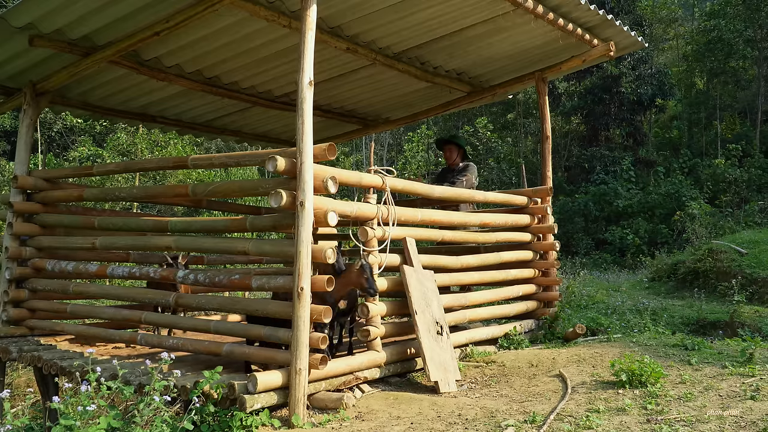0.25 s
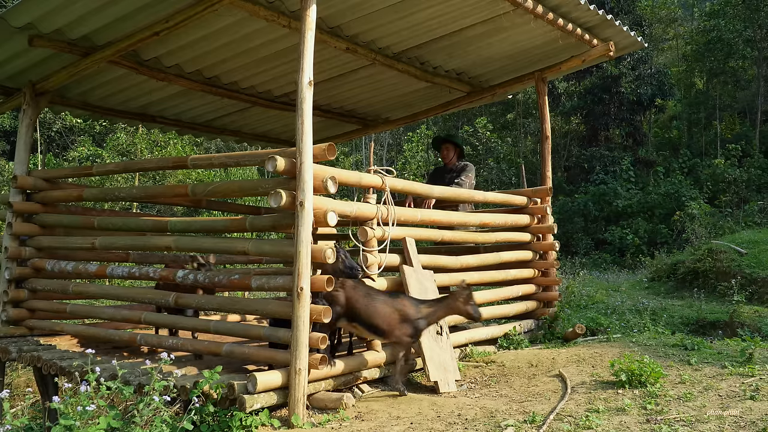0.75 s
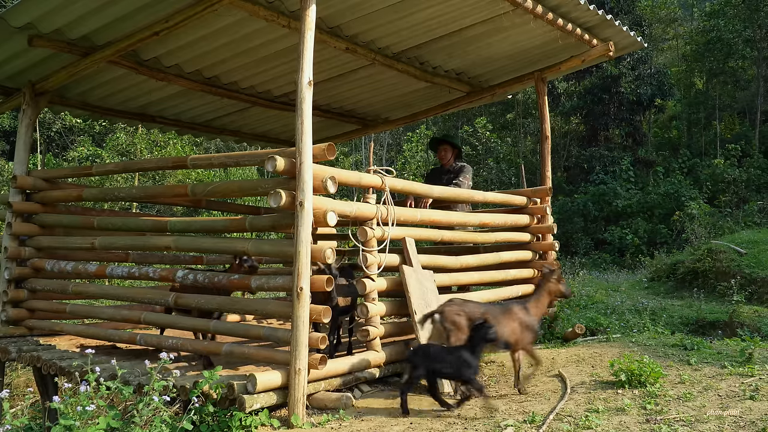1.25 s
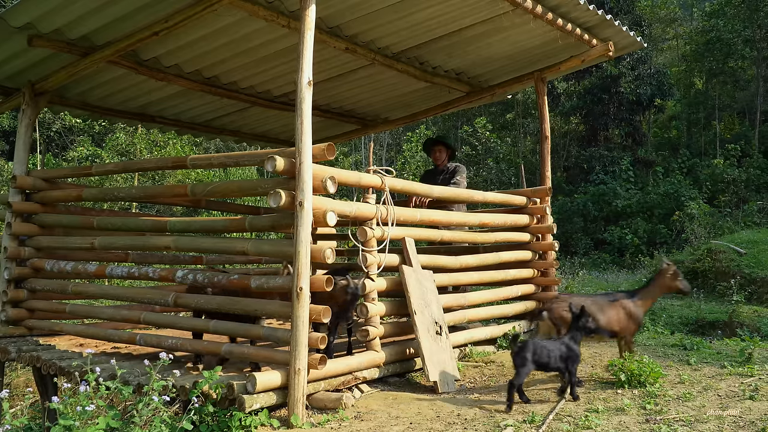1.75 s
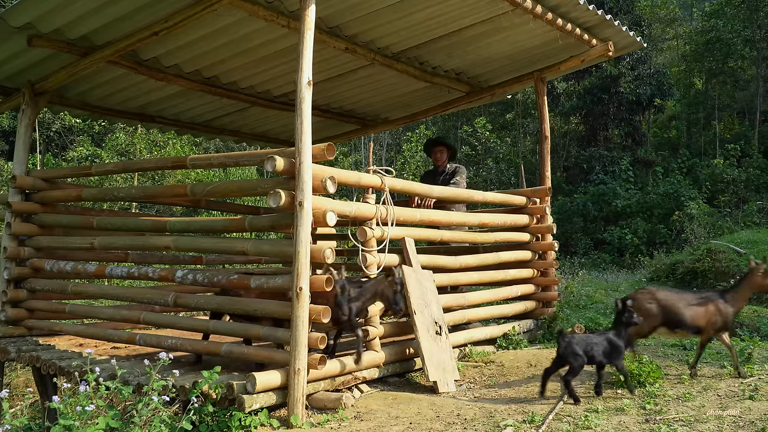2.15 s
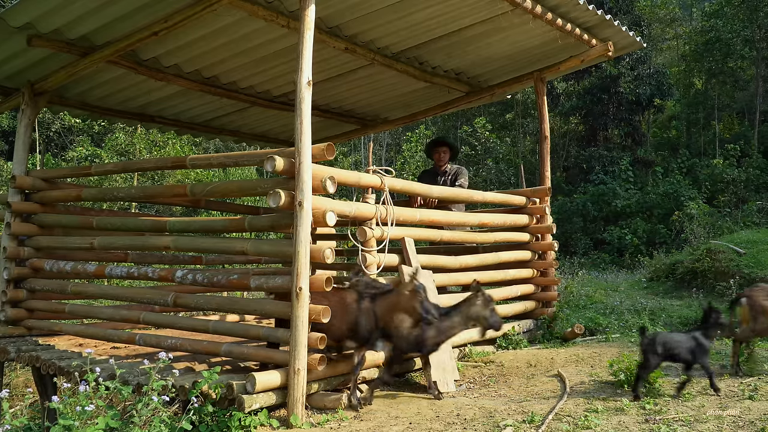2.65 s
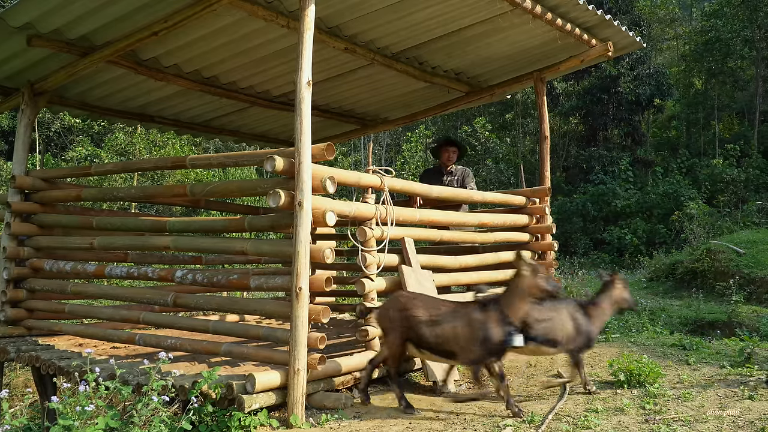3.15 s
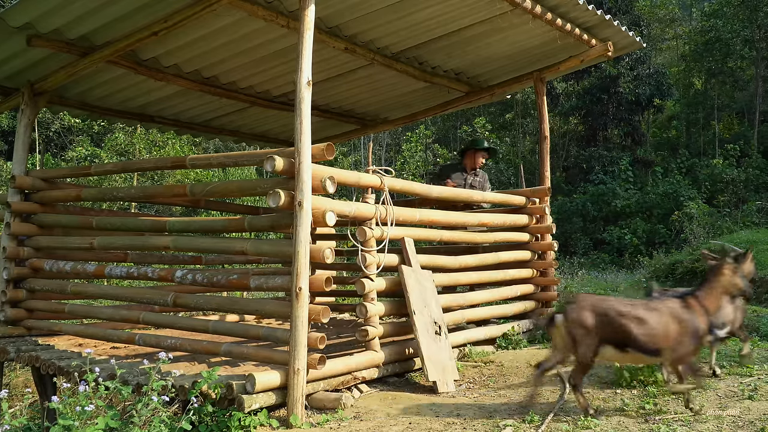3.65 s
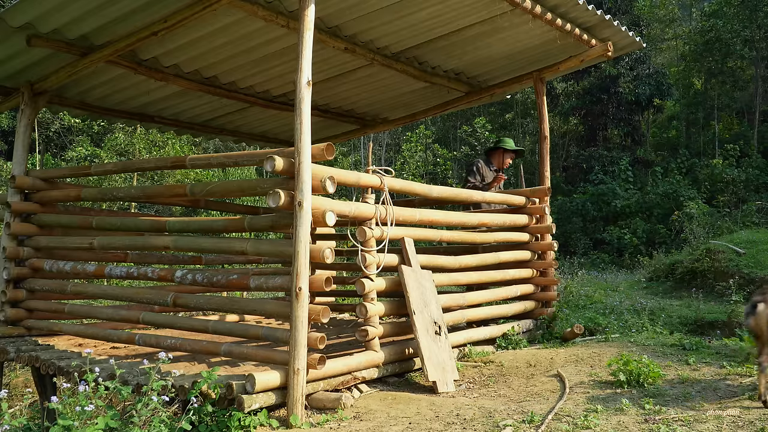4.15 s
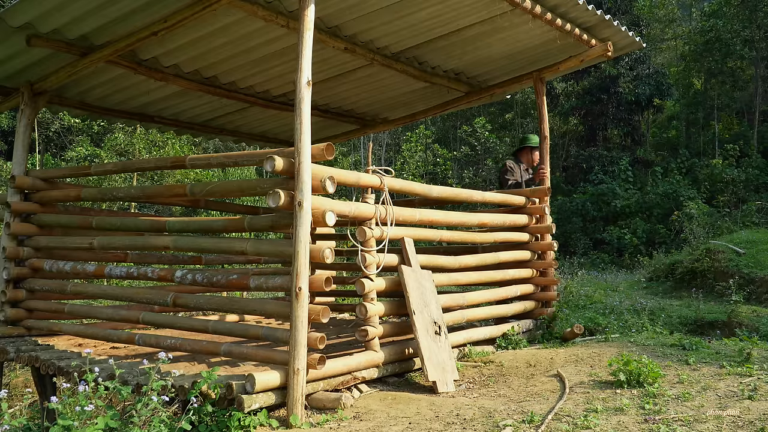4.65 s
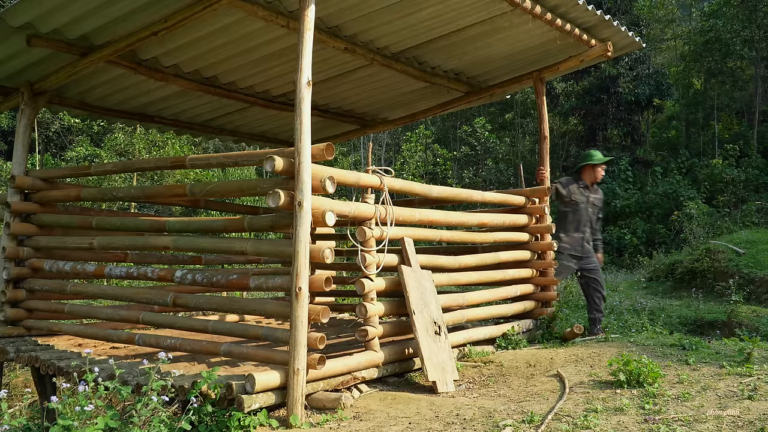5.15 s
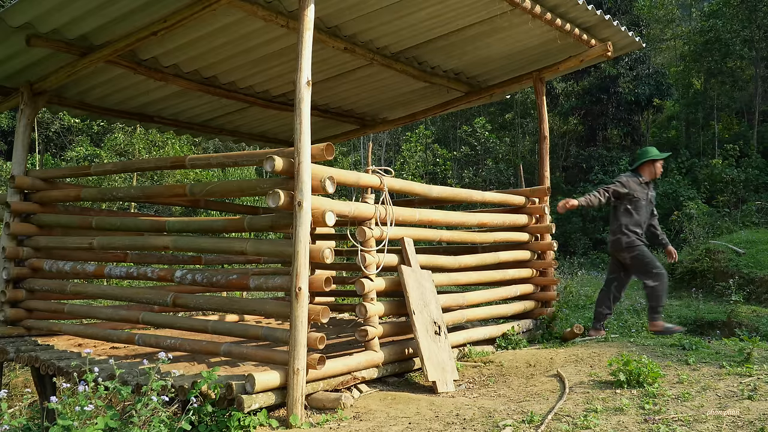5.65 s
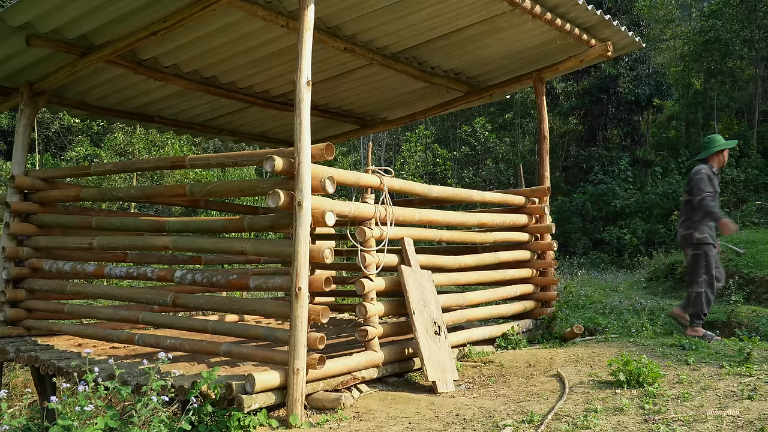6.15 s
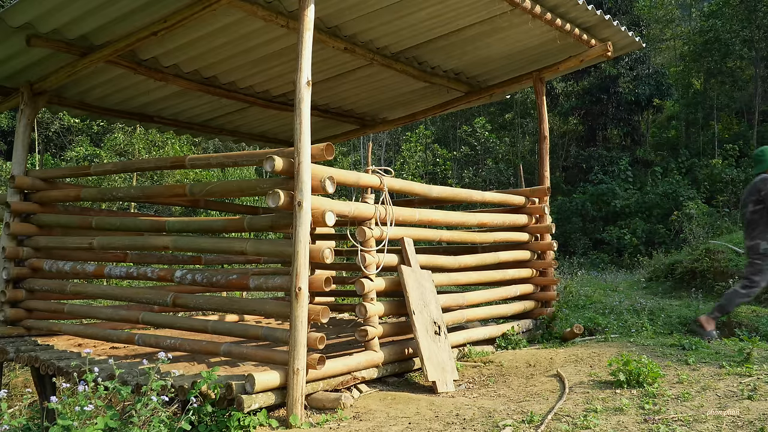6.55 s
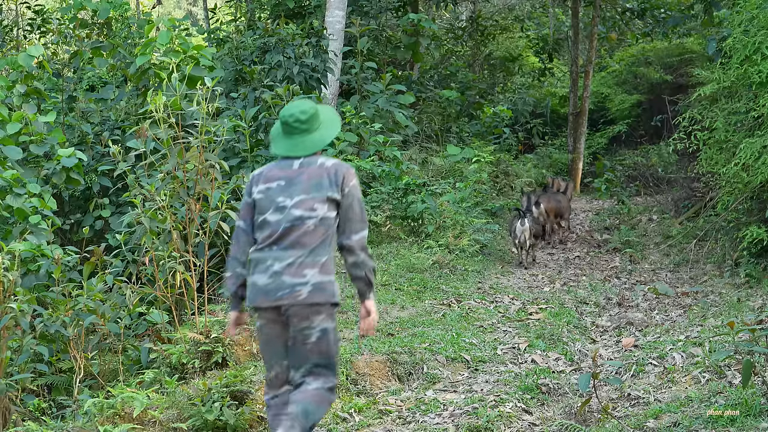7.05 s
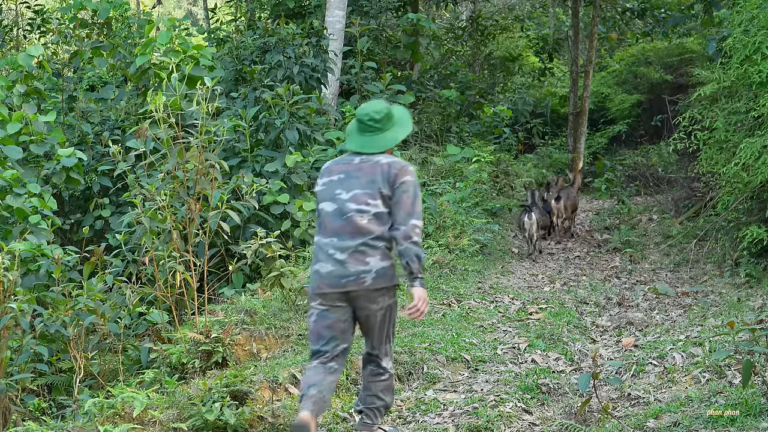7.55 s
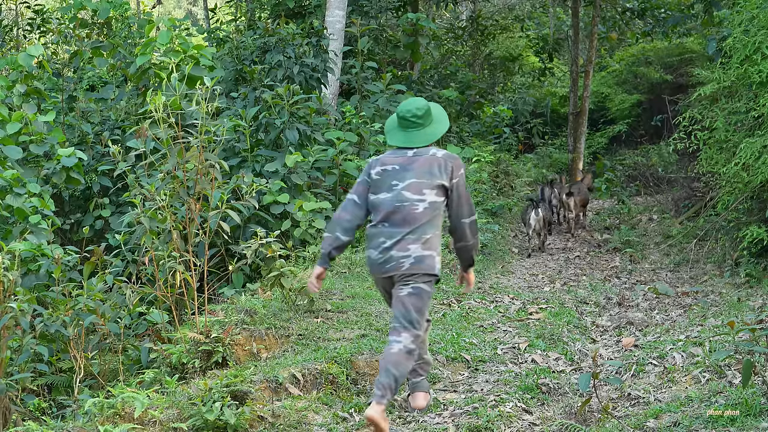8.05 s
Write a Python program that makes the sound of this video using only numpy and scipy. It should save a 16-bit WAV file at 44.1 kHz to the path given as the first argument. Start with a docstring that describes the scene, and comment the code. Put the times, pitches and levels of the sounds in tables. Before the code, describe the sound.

In the open beside a log pen, a faint hoarse squeal fades over the first 0.6 seconds among hoof knocks on wooden poles and dull shuffling. Around 0.7 to 1 second come more knocks, a scrape and crackling litter, as a small high bell begins on the left, first in sparse, uneven clinks. Faint thin bird chirps appear between 1 and 2.1 seconds. A strong hollow knock lands at 2.4, with scuffling after it. From 2.7 to 6.8 the bell jingles densely and irregularly, with sharp metal clicks, buzzing clapper rattles and tree echoes, moving to the right and sinking slightly in pitch as the goat runs away. A low faint rumble rises near 4.5. The hush swells toward 6.9, then drops back. From 7 to 8.3 there are soft, dull bell touches, dry leaf scrapes, a step near 8 and faint bird notes.

```python
"""A faint hoarse squeal fades while hooves knock and shuffle on poles: goats clamber out of a log pen.
A small bell then jingles on the neck of one goat and sinks in pitch as it gathers speed towards the forest.
The bell is a sum of decaying modes struck afresh by each blow; knocks are noise through wood resonances.
Shuffling and rustling leaves are random grains, small birds are gliding sines, rumble and hush are noise.
The microphone pair is mono below about 2 kHz."""
import sys
import numpy as np
from scipy import signal
from scipy.fft import rfft, irfft, next_fast_len
from scipy.io import wavfile
from scipy.ndimage import uniform_filter1d

SR = 44100
rng = np.random.default_rng(int(sys.argv[2]) if len(sys.argv) > 2 else 0)


def dump(signal):
    """Clip the signal to [-1, 1] and save it as 16-bit WAV at the path in sys.argv[1]."""
    limited = np.clip(np.atleast_2d(signal).T, -1, 1)
    pcm = np.round(limited * 32767).astype(np.int16)
    wavfile.write(sys.argv[1], SR, pcm)


N = 365834
TIME = np.arange(N) / SR

# blows of the clapper, the dullest of which only swell the ring; levels before trim:
# start_s, strike_tone_db, brightness_db (top modes over the strike tone), click_db
STRIKES = [(0.644, -42, 7.5, -31.5), (0.957, -40, -14, -65), (1.298, -30, 6.5, -19), (1.589, -35, -23, -75),
           (1.731, -28.5, -27.5, -75), (1.845, -45, 10.5, -26.5), (2.056, -43, 12, -36),
           (2.194, -41, 6.5, -50), (2.525, -48.5, 21, -24), (2.587, -37.5, 6, -43), (2.73, -25.5, 6, -12),
           (2.881, -27, 1, -21), (3.14, -30.5, 7, -16.5), (3.324, -32.5, 8.5, -17.5), (3.436, -42, 17, -27),
           (3.584, -28.5, 7.5, -14.5), (3.648, -37, 14, -23.5), (3.778, -31.5, -1, -23.5),
           (3.95, -35.5, 4, -31.5), (4.023, -32.5, 7, -15.5), (4.137, -34, 8, -30),
           (4.218, -32.5, 10, -19.5), (4.318, -30.5, 5, -30), (4.459, -31.5, -3.5, -45),
           (4.644, -30, 3.5, -20.5), (4.764, -27, -1, -20), (4.923, -33, -9, -38), (4.989, -37, 9.5, -25),
           (5.14, -31.5, -0.5, -18.5), (5.229, -37.5, 6, -23), (5.328, -33.5, 9, -23),
           (5.449, -54.5, 14, -26.5), (5.775, -24.5, -7.5, -19), (5.888, -34, 9.5, -43),
           (6.022, -36.5, 7.5, -19.5), (6.169, -48.5, 11.5, -16.5), (6.403, -35, 1.5, -25.5),
           (6.459, -40.5, 6.5, -27), (6.523, -20, -13, -16.5), (6.536, -42.5, -1, -50),
           (6.598, -42, 11.5, -37), (6.778, -34.5, 6, -34), (6.921, -64, 10, -23.5),
           (6.972, -39.5, -10.5, -61), (7.254, -48, 6, -58), (7.483, -44, -10.5, -53.5),
           (7.626, -48.5, 2.5, -56), (7.744, -52.5, 7.5, -58), (7.851, -46, 5.5, -54)]
# modes of the bell, many in close pairs: pitch_hz, level_db (within the mode's family), t60_s
BELL_MODES = [(1296.6, -1, 1.46), (1304.5, -4.5, 7), (2320, -22, 0.13), (3552, -20, 2.6),
              (3552, -1.5, 1.33), (5560, 1, 0.18), (6728, -0.5, 6), (6694, 11, 0.8), (7960, -60, .2),
              (8202, 0, 0.33), (8380, 2, 0.18), (8760, -4.5, 0.17), (9057, -3, 0.43), (9520, -15, 0.11),
              (9750, -52, 0.12), (10740, 2.5, 0.26), (11500, -7, 0.15), (11610, 0.5, 0.11),
              (12400, -0.5, 0.31), (12400, -26, 0.21), (13930, -18, 0.2), (14370, -12, 0.047),
              (15200, -8.5, 0.11), (15300, 0, 0.14)]


def amp(db):
    """Decibels to gain."""
    return np.exp(np.asarray(db) * (np.log(10) / 20))


def unit(x):
    """Scales to rms 1."""
    return x / np.sqrt(np.mean(np.abs(x) ** 2) + 1e-20)


def curve(rows):
    """A breakpoint control, read at every sample."""
    return np.interp(TIME, *np.transpose(rows))


def read(points, hz):
    """Reads a spectrum, straight between its points on a log-frequency axis."""
    point_hz, value = np.transpose(points)
    return np.interp(np.log(hz + 1), np.log(point_hz + 1), value)


def add(mix, s, sound):
    """Mixes a sound in at time s."""
    part = mix[..., max(round(s * SR), 0):][..., :sound.shape[-1]]
    part += sound[..., :part.shape[-1]]


def shaped(x, gain):
    """Filters x by gain, a function of frequency."""
    size = next_fast_len(x.shape[-1], True)
    spectrum = rfft(x, size) * gain(np.fft.rfftfreq(size, 1 / SR))
    return irfft(spectrum, size)[..., :x.shape[-1]]


def resonant(modes, hz):
    """Response of a body: broad, with resonances standing out."""
    return 1 + sum(amp(db) / (1 + 2j * (hz - mode_hz) / width) for mode_hz, width, db in modes)


def drift(rate, size=N):
    """Smooth random wander of rms about 1, with rate new values a second."""
    at = np.arange(size) * rate / SR
    return 1.2 * np.interp(at, np.arange(2048), rng.standard_normal(2048))


def panned(db):
    """Gains of left and right, db apart, at equal total power."""
    gains = amp([[db / 2], [-db / 2]])
    return unit(gains)


def bearing(s):
    """Channel gains for the belled goat's place at time s."""
    # where the belled goat is: time_s, left_over_right_db
    places = [(0.65, 9.5), (0.73, 4.5), (1.78, 6.5), (4.01, -11), (5.67, -4.5), (6.91, -7.5), (6.97, -2),
              (8.23, -3.5), (8.3, -4)]
    return panned(np.interp(s, *np.transpose(places)))


def distance_run():
    """Metres the belled goat has run away, at every sample: its speed summed over time."""
    # pace of the belled goat: time_s, speed_m_per_s
    pace = [(0, 0.5), (2.85, 0), (3.2, 2), (3.7, 1), (4.2, 4), (4.7, 4.5), (5.8, 4.5), (6.8, 6), (7.0, 0.5),
            (8.3, 4.5)]
    return np.cumsum(curve(pace)) / SR


def family_levels(s, tone_db, bright_db):
    """A harder blow lifts the upper families of modes more than the low ones."""
    # mode families from hum to top: offset_db (against the strike tone), brightness_share
    families = [(1, 0.2), (0.5, 0.027), (-1, 0.57), (1, 0.81), (-3, 1)]
    # extra level of the lowest family, the hum: time_s, level_db
    hum_curve = [(0.65, -4.5), (1.3, -20), (1.85, -15.5), (2.1, -8), (2.9, -5.5), (4.1, -10), (4.8, -20),
                 (4.99, -0.5), (5.14, -20), (5.9, -7.5), (6.4, -16.5), (6.8, -9), (7.48, -5), (7.65, -17)]
    offset_db, share = np.transpose(families)
    is_hum = np.arange(len(families)) == 0
    hum_db = np.interp(s, *np.transpose(hum_curve)) * is_hum
    return tone_db + offset_db + share * bright_db + hum_db


def bell(bell_db=-1.0, blow_spread_db=2, phase_spread_rad=0.75, scatter_near=0.73, scatter_per_m=0.082,
         flutter_hz=22, scatter_rise_s=0.025, contact_s=0.00068, soft_rise=1.33):
    """Each blow stops the old ring and starts a new one; scatter from the swinging bell makes modes flutter."""
    # borders between the families of modes: pitch_hz
    family_edges = [2000, 4500, 7200, 10000]
    # how far the left channel leads the right: pitch_hz, phase_rad
    left_phase = [(0, 13.5), (3500, -0.32), (4700, -2), (6500, -1.5), (8200, -2), (10700, -1.5),
                  (13000, -4.5), (15500, -5.5)]
    hz, mode_db, t60 = np.transpose(BELL_MODES)[:, :, None]
    family = np.searchsorted(family_edges, hz[:, 0])
    run_m = distance_run()
    heard_time = TIME - run_m / 343  # the growing path delays the sound and so lowers its pitch
    step = 32  # samples between the points of the slow controls
    # flutter_hz holds at 7 kHz: the higher the mode, the faster the bell's motion makes it flutter
    smoothing = [signal.butter(2, flutter_hz * f / 7000, fs=SR / step) for f in hz[:, 0]]
    out = np.zeros((2, N))
    ends = [row[0] for row in STRIKES[1:]] + [TIME[-1]]
    for (s, tone_db, bright_db, _), end in zip(STRIKES, ends):
        clock = heard_time[round(s * SR):round((end + .03) * SR)]
        t = np.arange(len(clock)) / SR
        slow_t = t[::step]
        blow, phase_error, start_turn = rng.standard_normal((3, len(hz), 1))

        # where the clapper lands decides how a family's energy is shared among its modes
        share = amp(mode_db + blow_spread_db * blow)
        share = share / np.sqrt(np.bincount(family, share[:, 0] ** 2))[family, None]
        family_db = family_levels(s, tone_db, bright_db)[family, None]
        level = share * amp(family_db - 60 * slow_t / t60)

        # more of the sound comes by scattered paths at high pitch and from far away
        scatter = (scatter_near + scatter_per_m * run_m[round(s * SR)]) * (hz / 8000) ** 0.12
        scatter = scatter * (1 - np.exp(-slow_t / scatter_rise_s))  # the direct sound arrives first
        chance = rng.standard_normal((len(hz), 1024, 2)) @ [1, 1j]
        flutter = np.array([unit(signal.lfilter(*ba, z)) for ba, z in zip(smoothing, chance)])
        flutter = flutter[:, -level.shape[1]:]
        swell = (level * (1 + scatter * flutter) / np.sqrt(1 + scatter ** 2)).astype(np.complex64)
        swell = uniform_filter1d(np.repeat(swell, step, 1), step, 1)[:, :len(t)]

        angle = (2 * np.pi * ((hz * clock + start_turn) % 1)).astype(np.float32)
        modes = swell * (np.cos(angle) + 1j * np.sin(angle))
        lead_rad = read(left_phase, hz) + phase_spread_rad * phase_error
        lead = np.exp(1j * lead_rad).astype(np.complex64)
        ring = np.array([(modes * lead).sum(0), modes.sum(0)]).real

        # a dull touch builds up more slowly; the next blow cuts the ring off
        rise_s = contact_s * amp(-soft_rise * min(bright_db, 0))
        contact = (1 - np.exp(-t / rise_s)) * np.exp(-np.maximum(t - (end - s), 0) / .003)
        add(out, s, np.sqrt(2) * ring * contact * bearing(s))
    return amp(bell_db) * out


def clapper(click_db=2.0, rattle_db=-7, click_s=0.0014, rebound_s=0.018, buzz_width_hz=80, wall_db=33):
    """The hard click of metal on metal, then a buzz as the clapper rebounds and half damps the wall."""
    # when the goat bounds, the clapper rolls round the wall: start_s, level_db (before trim), decay_s
    rolls = [(4.461, -31.5, 0.36), (4.767, -20.5, 0.083), (4.991, -28, 0.08), (5.448, -32, .13),
             (5.776, -20.5, 0.2), (5.891, -40, 0.16), (6.022, -19.5, 0.082), (6.778, -23.5, 0.048)]
    click, rattle, t = np.zeros((2, N)), np.zeros((2, N)), np.arange(13000) / SR
    for s, _, _, force_db in STRIKES:
        noise = rng.standard_normal((2, len(t)))
        add(click, s, amp(force_db) * bearing(s) * noise * np.exp(-t / click_s))
    buzzes = [(s, force_db, rebound_s) for s, _, _, force_db in STRIKES]
    for s, force_db, decay_s in buzzes + rolls:
        noise = rng.standard_normal((2, len(t)))
        rebounds = unit(noise * amp(4 * drift(400, size=len(t))))
        add(rattle, s, amp(force_db) * bearing(s) * rebounds * np.exp(-t / decay_s))
    # colour of the metal contact: (pitch_hz, level_db)
    colour = [(300, -37.0), (1200, -8), (3000, -4.0), (5500, -2.5), (9000, -13), (12000, -4.5), (16000, -5.0)]
    # the rebounds sound through the upper modes of the wall, which stand well clear of the hiss between them
    wall = [(hz, buzz_width_hz, wall_db + db * .7) for hz, db, _ in BELL_MODES if hz > 7000]
    click = shaped(click, lambda hz: amp(read(colour, hz)))
    rattle = shaped(rattle, lambda hz: unit(amp(read(colour, hz)) * resonant(wall, hz)))
    return amp(click_db) * click + amp(rattle_db) * rattle


def echoes(x):
    """Paths by way of trees ahead shorten as the goat runs, so they ring sharper and beat with the direct sound."""
    # echoes of the bell: starting_delay_s, catch_up_share (of the run), level_db
    paths = [(.014, 0.151, -9), (.038, 0.606, -4.5), (.067, 1.1, -18), (.105, 1.495, -23)]
    run_s = distance_run() / 343  # the run as travel time of sound
    out = np.zeros((2, N))
    for delay, share, db in paths:
        for side in range(2):
            jitter_s = rng.normal(0, .00006)
            echo_time = TIME - delay + share * run_s + jitter_s
            out[side] += amp(db) * np.interp(echo_time, TIME, x[side])
    return out


def knocks(tail_db=-19, tail_t60=0.21, bass_fall=1.22):
    """A hoof strikes the poles, whose resonances colour the noise; the loose stack rattles on briefly."""
    # hoof knocks, snaps and steps, before the trims of each band:
    # start_s, level_db, strongest_pitch_hz, fall_db_per_octave (above that pitch), t60_s
    blows = [(0.075, -28.5, 520, 5.5, 0.15), (0.198, -41, 660, 6.5, 0.081), (0.277, -36.5, 2500, 4, 0.13),
             (0.332, -47.5, 503, 4.5, 0.87), (0.696, -47, 3080, -1, 0.15), (0.738, -29, 650, 4, 0.14),
             (0.807, -32.5, 805, 7, 0.21), (0.863, -36.5, 1200, 5.5, .4), (0.968, -40, 2800, 10, 0.077),
             (0.915, -39.5, 1500, 4.5, 0.31), (1.045, -48.5, 1300, 3.5, 0.042),
             (1.602, -40.5, 440, 6.5, 0.38), (1.929, -52, 700, 8, .12), (2.404, -18, 560, 9, 0.14),
             (2.455, -32.5, 420, 16, 0.13), (2.502, -35.5, 400, 5, 0.15), (2.679, -40.5, 447, 13, 0.14),
             (2.789, -42.5, 1800, 4, 0.11), (2.939, -45, 403, 4.5, 0.17), (4.404, -34.5, 275, 6.5, 0.15),
             (5.682, -35.5, 990, 13, 0.074), (5.935, -37.5, 1060, 16.5, 0.053),
             (7.904, -50.5, 2290, 5, 0.43), (8.012, -39, 3060, 14, .38)]
    # bands with their own level and decay: low_hz, high_hz
    bands_hz = [(160, 420), (390, 760), (810, 1600), (1600, 3400), (3700, 9000), (9000, 15500)]
    # resonances of the dry poles: pitch_hz, width_hz, level_db (above the dense wood modes)
    poles = [(267, 31, 9.5), (368, 13.7, -2), (520, 65, 16), (659, 87, 10), (1010, 300, 8), (1593, 7.3, 11),
             (2086, 180, 4), (2980, 1350, 3.5)]
    band_life = [2.4, 0.96, 1.06, 0.43, 0.6, 0.6]  # multiplies both t60s
    band_trim_db = [-1.8, 0.31, -1.0, 1.4, 1.9, -5]
    out, t = np.zeros((2, N)), np.arange(15000) / SR
    centre_hz = np.sqrt(np.prod(bands_hz, axis=1))
    filters = [signal.butter(4, band, "band", fs=SR, output="sos") for band in bands_hz]
    for s, peak_db, peak_hz, fall_db, t60 in blows:
        octaves = np.log2(centre_hz / peak_hz)
        # the spectrum falls bass_fall times more steeply below its peak than above
        band_db = peak_db - fall_db * np.maximum(octaves, -bass_fall * octaves)
        wood = shaped(rng.standard_normal((3, len(t))), lambda hz: resonant(poles, hz))
        wood = wood[0] + 0.74 * wood[1:]  # partly shared by the channels
        for db, band, life, trim_db in zip(band_db, filters, band_life, band_trim_db):
            decay = amp(-60 * t / (t60 * life)) + amp(tail_db - 60 * t / (tail_t60 * life))
            part = signal.sosfilt(band, wood * decay)
            onset = part[:, :1323].std()  # the first 30 ms set the level
            add(out, s, amp(db + trim_db) * part / onset)
    return out


def grainy(colour, grain_db, grain_rate, clump_db, apart):
    """Many small contacts, grain_rate a second on average, clumped in time and given a colour."""
    shared, left, right = rng.standard_normal((3, N))
    size = amp(grain_db * np.minimum(rng.exponential(1, N), 5))
    size = size * (rng.random(N) < grain_rate / SR)
    grains = (shared + apart * np.array([left, right])) * size
    return unit(shaped(grains * amp(clump_db * drift(45)), colour))


def hooves(shuffle_db=7, rustle_db=8):
    """Dull shuffling on wood and earth, and crackling litter and grass, both built from random grains."""
    # shuffling hooves: time_s, level_db (before trim)
    shuffle_level = [(0.0, -55), (0.21, -60), (0.64, -61), (0.85, -52.5), (1.04, -61), (1.38, -61),
                     (1.76, -63.5), (2.24, -60.5), (2.43, -52.5), (2.58, -50), (3.23, -63), (4.27, -68),
                     (4.5, -63), (6.86, -71), (7.09, -72.5), (8.3, -78.5)]
    # colour of the shuffle: pitch_hz, level_db
    shuffle_colour = [(20, -37), (60, -10.5), (120, -3), (250, -0.5), (500, -3), (900, -5.5), (1500, -6),
                      (3000, -17), (8000, -22)]
    # rustling litter and grass: time_s, level_db (before trim)
    rustle_level = [(0.0, -54.5), (0.67, -67), (0.83, -47.5), (1.04, -63), (1.91, -67), (2.63, -56.5),
                    (2.96, -64.5), (3.49, -58.5), (4.06, -67), (4.5, -66.5), (6.79, -66.5), (7.09, -68.5),
                    (7.63, -63), (8.3, -62.5)]
    # colour of the rustle: pitch_hz, level_db
    rustle_colour = [(200, -8.5), (700, -13), (1500, -3.5), (2600, 2), (4500, -1.5), (8000, -6),
                     (12000, -14), (16000, -19)]
    shuffle = grainy(lambda hz: amp(read(shuffle_colour, hz)), 1.6, 2500, 1.47, 0.21)
    rustle = grainy(lambda hz: amp(read(rustle_colour, hz)), 0.9, 5000, 3.3, 0.93)
    shuffle = shuffle * amp(curve(shuffle_level) + shuffle_db)
    return shuffle + rustle * amp(curve(rustle_level) + rustle_db)


def scrapes(scrape_db=-2, rise_s=0.05, fall_s=0.035):
    """Each drag of a foot swells, holds and dies away; wood sounds duller than leaves."""
    # a foot drags over wood or through dry leaves: start_s, hold_s, level_db (before trim), treble_edge_hz
    drags = [(0.725, 0.28, -45, 3950), (2.499, 0.082, -50, 5000), (3.511, 0.11, -62, 8000),
             (7.653, 0.38, -60, 14000), (7.981, .06, -38, 14000), (8.101, 0.16, -50.5, 14000)]
    # colour of the scrape: pitch_hz, level_db
    scrape_colour = [(200, 1), (700, -12), (1500, -8), (2600, 1), (6000, -4), (13000, -4.5)]
    grains = grainy(lambda hz: amp(read(scrape_colour, hz)), 2.4, 3000, 2.0, 0.55)
    out, t = np.zeros((2, N)), TIME[:SR]
    for s, hold, db, edge_hz in drags:
        drag = np.minimum(t / rise_s, 1) * np.exp(-np.maximum(t - rise_s - hold, 0) / fall_s)
        piece = grains[:, rng.integers(N - SR):][:, :SR]
        rub = shaped(piece, lambda hz: 1 / np.hypot(1, (hz / edge_hz) ** 2))
        add(out, s - rise_s, amp(db + scrape_db) * drag * unit(rub))
    return out


def squeal(squeal_db=-1):
    """Fuzzy resonances, slow noise carried on each pitch, that glide together."""
    # fading level of the squeal: time_s, level_db (before trim)
    squeal_level = [(0, -41.5), (.15, -49.5), (.33, -45), (0.431, -49), (.52, -50), (.58, -60), (.63, -90)]
    # its resonances: pitch_hz (before the glide), width_hz, level_db (against each other)
    squeal_modes = [(1780, 61, -6), (2536, 240, 2), (3120, 120, -3), (3500, 480, -8)]
    # common glide: time_s, pitch_ratio
    glide = [(0, 1.02), (.3, 1.01), (.42, .975), (.55, .985)]
    s, db = np.transpose(squeal_level)
    t = TIME[:round(s[-1] * SR)]
    glided_time = np.cumsum(curve(glide)[:len(t)]) / SR
    sound = 0
    for hz, width, mode_db in squeal_modes:
        chance = rng.standard_normal((len(t), 2)) @ [1, 1j]
        fuzz = signal.lfilter(*signal.butter(2, width / 2, fs=SR), chance)
        sound = sound + amp(mode_db) * (unit(fuzz) * np.exp(2j * np.pi * hz * glided_time)).real
    out = np.zeros((2, N))
    add(out, 0, unit(sound) * amp(np.interp(t, s, db) + squeal_db))
    return out


def birds(waver=0.01):
    """Thin whistles that glide quickly and then hold, roughened on their way through the leaves."""
    # assorted calls: start_s, length_s, start_hz, end_hz, level_db (before the mix)
    calls = [(0.018, 0.016, 9000, 5800, -36), (1.046, 0.068, 7350, 7340, -49),
             (1.17, 0.18, 7500, 7450, -60), (2.12, 0.016, 4690, 6230, -44), (4.81, 0.073, 1760, 1860, -51),
             (4.893, 0.081, 1970, 1790, -49.5), (8.098, 0.11, 6600, 5100, -46),
             (8.237, 0.064, 2080, 2175, -50.5)]
    # one small bird repeats a rising chirp: start_s, level_db (before the mix)
    chirps = [(1.408, -53), (1.574, -51), (1.684, -54), (1.961, -57), (2.1, -56)]
    chirp_s, chirp_start_hz, chirp_end_hz = 0.07, 7500, 7800
    chirp_calls = [(s, chirp_s, chirp_start_hz, chirp_end_hz, db) for s, db in chirps]
    out = np.zeros((2, N))
    for s, length, start_hz, end_hz, db in calls + chirp_calls:
        u = np.linspace(0, 1, round(length * SR))  # progress through the call
        hz = end_hz + (start_hz - end_hz) * (1 - u) ** 2
        hz = hz * (1 + waver * drift(171, size=len(u)))
        rough = unit(1 + drift(500, size=len(u)))
        whistle = np.sin(np.pi * u) * np.sin(2 * np.pi * np.cumsum(hz) / SR)
        add(out, s, amp(db) * rough * whistle * panned(1.3))
    return out


def rumble(rumble_db=-1):
    """Faint lumpy low noise, alike in both channels."""
    # level of the rumble: time_s, level_db (before trim)
    rumble_level = [(0, -54), (.9, -61), (1.3, -60), (3.8, -66.5), (4.45, -54.5), (5.3, -59), (6.8, -73),
                    (7.05, -77), (8.3, -100.5)]
    # colour: (pitch_hz, level_db)
    colour = [(20, -22), (55, -4.5), (90, 0.0), (140, -3), (250, -11.5), (600, -49), (2000, -70)]
    lumps = rng.standard_normal(N) * amp(2.5 * drift(12))
    return amp(curve(rumble_level) + rumble_db) * unit(shaped(lumps, lambda hz: amp(read(colour, hz))))


def forest():
    """The hush of the hillside: wide noise, hollow around 800 Hz, that swells and then drops back."""
    # colour of the hush: pitch_hz, level_db
    hush_colour = [(20, -38), (50, -2.5), (100, 9), (200, 10), (400, -4), (800, -57), (1600, -3),
                   (2500, -2.5), (4000, 1.5), (5200, -1.5), (8000, 1.5), (12000, -4), (16000, -1)]
    # level of the hush: time_s, level_db
    hush_level = [(0, -72), (6.9, -44.5), (7.05, -57.5), (8.3, -54)]
    noise = rng.standard_normal((3, N))
    hush = unit(shaped(noise[0] + 2.3 * noise[1:], lambda hz: amp(read(hush_colour, hz))))
    return amp(curve(hush_level) + 0.2 * drift(3)) * hush


def outdoors(x, t60_low, t60_high):
    """Diffuse scatter from the pen, the ground and the trees: sparse random taps, t60 set by pitch."""
    size = 26000
    taps = rng.standard_normal((2, size)) * (rng.random((2, size)) < .06)
    hz, t, z = signal.stft(taps, SR, nperseg=256)
    t60 = read([(300, t60_low), (12000, t60_high)], hz)[:, None]
    decaying = z * amp(-60 * t / t60) * np.minimum(t / 0.012, 1)
    tail = signal.istft(decaying, SR, nperseg=256)[1]
    return signal.fftconvolve(x, tail / np.linalg.norm(tail[0]), axes=1)[:, :N]


def scene():
    """Bell, hooves and birds in the open, over the forest."""
    ring, wood, song = bell(), knocks(), birds()
    jingle = ring + clapper()
    jingle = jingle + echoes(ring) + amp(-15) * outdoors(jingle, 1.0, 0.23)
    wood = wood + amp(-11.5) * outdoors(wood, 0.4, 0.15)
    song = amp(-3) * song + amp(-2) * outdoors(song, .4, .3)
    return jingle + wood + song + squeal() + hooves() + scrapes() + forest() + rumble()


def record(dry, mono_hz=2300, edge_hz=15850):
    """The microphone pair merges the lows to mono; then a low-pass sets the band limit."""
    mid, side = (dry[0] + dry[1]) / 2, (dry[0] - dry[1]) / 2
    side = shaped(side, lambda hz: 0.0048 + 1 / (1 + (mono_hz / (hz + 1)) ** 5))
    low_pass = signal.firwin(255, edge_hz, window=("kaiser", 8), fs=SR)
    return signal.oaconvolve(np.array([mid + side, mid - side]), low_pass[None], "same", axes=1)


dry = scene()
out = record(dry)
dump(out)
```